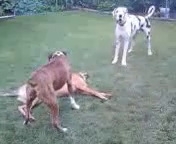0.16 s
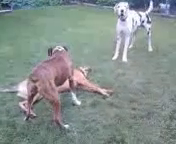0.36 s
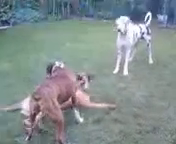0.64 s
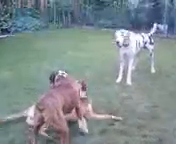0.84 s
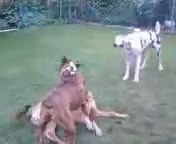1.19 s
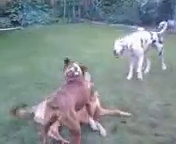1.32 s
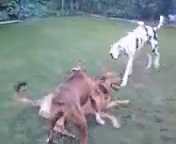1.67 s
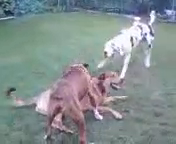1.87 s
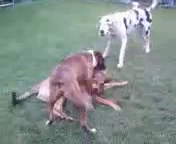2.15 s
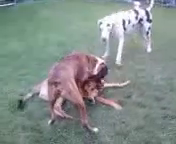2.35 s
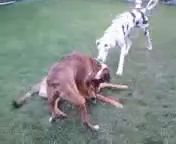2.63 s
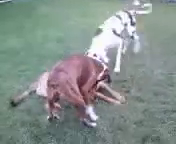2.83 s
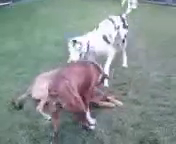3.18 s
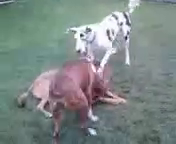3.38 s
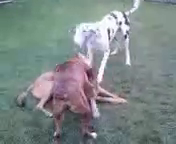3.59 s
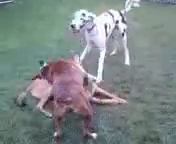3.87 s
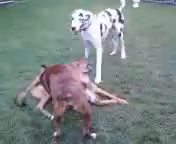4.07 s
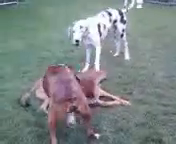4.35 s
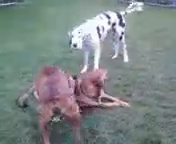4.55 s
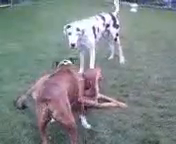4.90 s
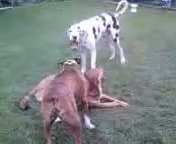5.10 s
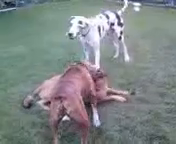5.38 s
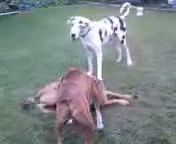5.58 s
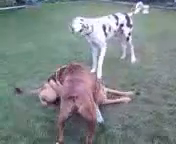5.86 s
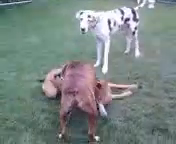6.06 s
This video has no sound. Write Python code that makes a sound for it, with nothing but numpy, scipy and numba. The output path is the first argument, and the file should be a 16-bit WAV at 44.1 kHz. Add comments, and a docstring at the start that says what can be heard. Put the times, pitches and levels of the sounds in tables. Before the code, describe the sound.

Quiet outdoor air and faint hiss open the scene. A large dog barks twice, hoarse and loud, then wrestling dogs growl low and snarl once, with a few guttural rumbles after. Four more single barks follow at intervals of roughly two thirds of a second. Fences and trees return short, weak echoes. The cheap microphone is close, narrow in band and distorts on the barks.

```python
"""Six barks and a snarl outdoors

A large dog barks six times close by, while wrestling dogs growl and snarl once.
Each bark is a rough pulse train shaped by throat and mouth, often ringing on its fifth harmonic.
Fences return distinct echoes and trees scatter, over quiet outdoor air and a faint uneven hiss
with soft swells, some perhaps from grass, and short noisy ticks.
The recorded band is narrow, closed above about 4 kHz, then clipped, which adds treble."""
import sys
import numpy as np
from scipy import signal
from scipy.fft import rfft, irfft, next_fast_len
from scipy.io import wavfile
from scipy.ndimage import uniform_filter1d
from numba import njit

SR = 44100
rng = np.random.default_rng(int(sys.argv[2]) if len(sys.argv) > 2 else 0)


def store_pcm(level_fs):
    """Save levels as 16-bit WAV."""
    pcm = np.round(np.clip(level_fs, -1, 1) * 32767).astype(np.int16)
    wavfile.write(sys.argv[1], SR, np.atleast_2d(pcm).T)


N = 274734

# All levels in the tables are relative: source functions may add a common gain or trim.
# One row per call: start_s, length_s, attack_s, release_db_per_s (nominal), widest_jaw (0-1 of the call),
#   pitch_hz (before bends), climb (share by which pitch and main resonance rise from start to end),
#   roughness (0-1, once settled), ring (0-1, at full opening), chest_db, deepen_db (throat, start to end),
#   throat_db, main_db, mouth_db, teeth_db, throat_hz, main_hz, mouth_hz, teeth_hz (before jaw motion)
BARK_CALLS = [ (1.050, 0.14, 0.02, 269, .47, 178.9, -.05, .4, .62, -45, -6, -18, -3, -12.5, -23, 517, 866, 1208, 2563),
              (1.629, 0.15, .02, 580, 0.41, 171, -.09, .6, 0.48, -38, 2.5, -20, -3.5, -10.5, -25, 471, 883, 1086, 2620),
              (3.593, 0.17, 0.021, 720, .6, 189.1, -0.011, 0.25, .04, -36, 12, -16.5, -6, -9, -25.5, 419, 880, 1063, 2770),
              (4.345, 0.17, .034, 540, .58, 171.2, .04, .58, .2, -39, 5, -17, -3.5, -4.5, -27, 502, 864, 1135, 2950),
              (5.038, .157, .028, 480, .52, 167.8, .03, .4, 0.057, -38.5, -8, -15, -4, -7.5, -31.5, 459, 896, 1085, 2690),
              (5.688, 0.16, 0.019, 647, .6, 173.1, 0.031, .5, 0.17, -43.5, -9, -13, -4, -8.5, -33, 493, 900.3, 1060, 2960)]
SNARL_CALLS = [(2.581, .215, .035, 340, .58, 235.7, .06, 0.35, 0.34, -32.5, 2.4, -16, -23.5, -17.5, -52, 425, 904, 1470, 2200)]
# Damping of one resonator stage for throat, main, open mouth and teeth: width_hz
BARK_WIDTHS_HZ = [237, 373, 454, 720]
SNARL_WIDTHS_HZ = [246, 340, 503, 650]
# How the same four resonances follow the jaw: shut_db (lost when shut), shut_drop (share of frequency
#   lost when shut), late_db (gained start to end), sag (share of frequency lost start to end),
#   speed (factor on the call's release)
BARK_JAW_RULES = [(1.976, 0.12, -1.5, 0.34, 0.75), (7.2, .07, -0.5, .01, 0.96), (6.1, -0.15, -1, .01, 0.63),
                  (48.84, .08, -1.5, .02, 2.8)]
SNARL_JAW_RULES = [(2.16, .06, 2.5, 0.044, 1.15), (11.1, 0.075, -8, .05, 0.74),
                   (22.2, -0.0052, -7, 0.0081, 2), (12, .04, -2.5, 0, 1.1)]
# Growls, and the low tail of the snarl at 2.8 s: start_s, length_s, chest_db, throat_db
GROWL_CALLS = [(2.08, 0.26, -44.5, -47), (2.33, 0.22, -37, -35), (2.8, 0.09, -41, -27.5),
               (2.925, 0.057, -36, -27.5), (2.99, 0.051, -32, -25.5), (3.4, .2, -40.5, -43.5)]
# Chest and throat resonances of a growl: centre_hz, width_hz (one stage)
GROWL_BODY_MODES = [(135, 220), (345, 208)]
# Soft swells of hissing noise, some perhaps from grass: start_s, length_s, level_db
NOISE_SWELLS = [(.35, 0.11, -73), (.67, 0.15, -68), (1.95, 0.99, -64.5), (2.86, 0.32, -59.5),
                (3.37, 0.138, -62.5), (4.01, 0.11, -53), (6.0, 0.45, -60)]
# Short noisy ticks: time_s, level_db
SHORT_TICKS = [(0.618, -50), (0.6833, -40.5), (0.729, -54), (1.442, -36.5), (2.406, -43.5), (3.4114, -39),
               (5.442, -41.5)]
# Spectrum shared by hiss, swells and ticks: frequency_hz, density_db (per Hz)
HISS_SPECTRUM = [(200, -1.5), (600, 0.5), (1100, 2), (2000, -2.5), (3100, -4), (5000, -40)]
# Fence reflections: delay_s, level_db
FENCE_ECHOES = [(.021, -24), (.047, -21), (.088, -28), (.33, -60.5)]
# Decay of sound scattered by the trees: frequency_hz, t60_s, level_db
TREE_DECAY = [(150, 1, 11.5), (510, 1, -5), (760, 1, -8.5), (1130, 0.89, -1.5), (1690, 0.47, 10.5),
              (3060, 0.83, 0)]
# Spectrum of the outdoor background: frequency_hz, density_db (per Hz)
AIR_SPECTRUM = [(12, -25.5), (20, 5.5), (22, -18.5), (113, -13), (224, -23.5), (343, -22), (1320, -38.5),
                (1630, -33.5), (1740, -39), (2340, -24.5), (3300, -35.5), (4290, -73.5), (7260, -120)]
# Narrow recorded band, closed above about 4 kHz: frequency_hz, gain_db
RECORDING_BAND = [(20, 9.5), (3000, -4.5), (3500, -1), (4000, -7.5), (4400, -36), (4800, -64), (6000, -100)]

CHEEK_HZ, CHEEK_WIDTH_HZ = 1890, 330  # a weak higher resonance that opens with the mouth
CLOSING_S = .05  # the jaw takes this long to shut once the effort ends
START_ROUGH = .9  # roughness (0-1) of the folds before they settle
WANDER = .028  # rms share by which the pitch drifts within a call
# the chest hums just ahead of the call and grows less with effort (an exponent below 1)
CHEST_WIDTH_HZ, CHEST_LEAD_S, CHEST_GROWTH = 277, .018, 0.53
ONSET_DB, ATTACK_CURVE = 47.5, 1.336  # depth below full level at the start; over 1 the rise is S-shaped
GROWL_START_DB, GROWL_SWELL_DB, GROWL_FADE_S = -13.5, 5.5, 0.01
HISS_DB, SWELL_GAIN_DB, TICK_GAIN_DB = -64, 3.5, -11  # a faint uneven hiss runs throughout
AIR_DB = -57.5
TOP_HZ = 15800  # upper limit after clipping


def barks():
    """Source-filter principle: six loud, hoarse calls driven through a quickly opening jaw."""
    return voice(BARK_CALLS, BARK_JAW_RULES, BARK_WIDTHS_HZ, trims_db=[-0.12, 0.29, -0.86, 0.8],
                 cheek_db=-15.5, jitter=.045, rasp_db=-0.58, pitch_drop=.12, waver_db=1.2)


def snarl():
    """Source-filter principle: one softer call whose pitch falls further as the jaw shuts."""
    return voice(SNARL_CALLS, SNARL_JAW_RULES, SNARL_WIDTHS_HZ, trims_db=[-4.5, -1.2, -3.7, -9.0],
                 cheek_db=-13, jitter=0.049, rasp_db=2.5, pitch_drop=.33, waver_db=2.0)


def voice(calls, follow, widths_hz, trims_db, cheek_db, jitter, rasp_db, pitch_drop, waver_db, order=5):
    """Source and filter: folds drive chest and tract; the main resonance can lock on to a harmonic."""
    columns = current(calls, CHEST_LEAD_S)
    age, length, attack, release, widest, pitch, climb, rough, ring, chest_db, deepen_db = columns[:11]
    levels_db, tunings_hz = columns[11:15], columns[15:]
    progress = np.clip(age / (length + CLOSING_S), 0, 1)
    shut, late = 1 - jaw(progress, widest), progress - .5

    rough = rough + (START_ROUGH - rough) * shut * (1 - progress * .85)
    bend = 1 + climb * late + WANDER * wobble(32)
    pitch = pitch * bend * (1 - pitch_drop * shut)
    source, cycles = folds(pitch, rough, jitter, shimmer_db=4.5)

    bands, gains = [], []
    pulls = [1, bend, 1, 1]  # only the main resonance bends with the pitch
    for db, hz, width, trim, pull, rule in zip(levels_db, tunings_hz, widths_hz, trims_db, pulls, follow):
        shut_db, shut_drop, late_db, sag, speed = rule
        tuned_hz = hz * pull * (1 - shut_drop * shut - sag * late)
        bands.append(steady(resonate(source, tuned_hz, width)))
        level_db = db + trim - shut_db * shut ** 2 + late_db * late + waver_db * wobble(45)
        gains.append(amp(level_db) * effort(age, length, attack, speed * release))

    throat, main, mouth, teeth = bands
    throat = throat * amp(deepen_db * late)
    ring = np.clip(ring * np.sqrt(1 - shut), 0, 1)
    harmonic = np.cos(2 * np.pi * order * cycles)
    main = steady(np.sqrt(1 - ring) * main + np.sqrt(ring) * harmonic)
    mouth = mouth + amp(cheek_db) * steady(resonate(source, CHEEK_HZ, CHEEK_WIDTH_HZ))
    tract = sum(band * gain for band, gain in zip([throat, main, mouth, teeth], gains))

    hum = effort(age + CHEST_LEAD_S, length + CHEST_LEAD_S, attack, release) ** CHEST_GROWTH
    chest = amp(chest_db) * hum * steady(resonate(source, pitch, CHEST_WIDTH_HZ))
    rasp = unit(amp(rasp_db * rough * wobble(260)))  # flapping tissue chops the rough parts
    return rasp * (chest + tract)


def folds(pitch, rough, jitter, shimmer_db):
    """Glottal excitation: uneven pulses mixed with air that puffs once a cycle; also the cycle count."""
    cycles = np.cumsum(pitch * (1 + jitter * rough * wobble(170))) / SR
    glottal_ticks = np.diff(np.floor(cycles), prepend=0)
    pulses = unit(glottal_ticks * amp(shimmer_db * wobble(150)))
    puffs = unit(rng.standard_normal(N) * (1.7 + np.exp(-4 * (cycles % 1))))
    rough = np.clip(rough, 0, 1)
    return np.sqrt(1 - rough) * pulses + np.sqrt(rough) * puffs, cycles


def jaw(progress, widest):
    """Articulation: the mouth opens and shuts in one arch, from 0 shut to 1 wide."""
    skew = np.log(.5) / np.log(np.clip(widest, .1, .9))  # puts the peak at the widest moment
    return np.abs(np.sin(np.pi * progress ** skew))


def effort(age, length, attack, release):
    """Breath pressure: one push of air rises fast, holds, then falls steadily in dB."""
    rise_db = ONSET_DB * np.exp(-(np.maximum(age, 0) / attack) ** ATTACK_CURVE)
    fall_db = release * np.maximum(age - length, 0)
    return np.clip(age / 0.0052, 0, 1) * amp(-rise_db - fall_db)


def resonate(x, hz, width, count=3):
    """Cascaded resonance: repeated moving resonators leave dark valleys on both sides."""
    hz = hz * np.ones(N)
    step, damping = 2 * np.sin(np.pi * hz / SR), width / hz
    for _ in range(count):
        x = band_pass(x, step, damping)
    return x


@njit
def band_pass(x, step, damping):
    """Damped oscillation: a two-pole resonator whose tuning may change at every sample."""
    y, low, band = np.zeros(len(x)), 0., 0.
    for i in range(len(x)):
        low += step[i] * band
        band += step[i] * (x[i] - low - damping[i] * band)
        y[i] = band * damping[i]
    return y


def growls():
    """Low-rate phonation: slow, irregular pulses excite the chest and a closed mouth."""
    source, _ = folds(np.full(N, 62.), rough=.5, jitter=.25, shimmer_db=1.5)
    age, length, *levels_db = current(GROWL_CALLS)
    swell = amp(GROWL_START_DB + GROWL_SWELL_DB * np.minimum(age / length, 1))
    fade_in = np.clip(age / GROWL_FADE_S, 0, 1)
    fade_out = np.exp(-np.maximum(age - length, 0) / GROWL_FADE_S)
    uneven = amp(2.2 * wobble(28.33))
    body = sum(steady(resonate(source, hz, width)) * amp(db)
               for (hz, width), db in zip(GROWL_BODY_MODES, levels_db))
    return swell * fade_in * fade_out * uneven * body


def fences(x):
    """Specular reflection: each fence returns one delayed, weaker copy."""
    return sum(amp(db) * np.pad(x, (round(delay * SR), 0))[:N] for delay, db in FENCE_ECHOES)


def trees(x, wet_db, swell_s, patchy_db=3, count=2):
    """Diffuse scattering: patchy decaying noise tails, smeared by moving leaves."""
    hz, t, z = signal.stft(rng.standard_normal((count, SR)), SR, nperseg=256)
    decay = np.array(TREE_DECAY)
    t60 = along(decay[:, [0, 1]], hz)[:, None]
    colour_db = along(decay[:, [0, 2]], hz)[:, None]
    patches = uniform_filter1d(rng.standard_normal(z.shape), 3, 1)  # smooth over frequency
    patches = unit(uniform_filter1d(patches, 24, 2))  # then over time
    level_db = colour_db + patchy_db * patches * np.minimum(t / 0.27, 1) - 60 * t / t60
    tails = signal.istft(z * amp(level_db) * (1 - np.exp(-t / swell_s)), SR, nperseg=256)[1]
    tails = tails / np.linalg.norm(tails)
    return amp(wet_db) * sum(signal.fftconvolve(x * wobble(130), tail)[:N] for tail in tails)


def hiss():
    """Amplitude-modulated noise: a faint uneven hiss with soft swells and short noisy ticks."""
    t = np.arange(N) / SR
    age, length, swell_db = current(NOISE_SWELLS)
    arch = np.sin(np.pi * np.clip(age / length, 0, 1))
    level = amp(HISS_DB) + amp(swell_db + SWELL_GAIN_DB) * arch
    uneven = unit(amp(3.2 * wobble(16) + 3.2 * wobble(110)))
    # each tick peaks 3 ms after its time and decays both ways over 4 ms
    ticks = sum(amp(db + TICK_GAIN_DB) * np.exp(-np.abs(t - start - .003) / .004)
                for start, db in SHORT_TICKS)
    return (level * uneven + ticks) * noise(HISS_SPECTRUM)


def air():
    """Broadband ambience: coloured noise whose level drifts slowly."""
    return amp(AIR_DB) * noise(AIR_SPECTRUM) * amp(0.81 * wobble(0.73))


def current(rows, lead=0):
    """Event timing: per sample, time since the latest event (chosen lead s early) and its other columns."""
    rows, t = np.array(rows), np.arange(N) / SR
    latest = np.maximum(np.searchsorted(rows[:, 0], t + lead) - 1, 0)
    start, *columns = rows[latest].T
    return t - start, *columns


def noise(spectrum):
    """Spectral shaping: white noise becomes coloured noise of rms 1."""
    return unit(filtered(rng.standard_normal(N), lambda f: amp(along(spectrum, f))))


def wobble(rate, order=6):
    """Random modulation: a smooth curve of rms 1 with rate knots a second."""
    fine = signal.resample_poly(rng.standard_normal(int(N * rate / SR) + 4), order, 1)
    return unit(np.interp(np.arange(N) * rate * order / SR, np.arange(len(fine)), fine))


def filtered(x, response):
    """Linear filtering: the spectrum of x times a response given as a function of frequency."""
    m = next_fast_len(N + SR // 2)
    return irfft(rfft(x, m) * response(np.fft.rfftfreq(m, 1 / SR)), m)[:N]


def along(points, hz):
    """Logarithmic frequency scale: (Hz, value) points interpolated on a log axis."""
    f, v = np.transpose(points)
    return np.interp(np.log(hz + 1), np.log(f + 1), v)


def steady(x, size=680):
    """Power normalization: x held near rms 1 over a few voice cycles (size in samples)."""
    power = uniform_filter1d(uniform_filter1d(x ** 2, size), size)
    return x / np.sqrt(np.abs(power) + 1e-12)


def unit(x):
    """Power normalization: the whole of x at rms 1."""
    return x / np.sqrt(np.mean(x ** 2) + 1e-20)


def amp(db):
    """Logarithmic level: decibels to amplitude gain."""
    return 10 ** (np.asarray(db) / 20)


def scene():
    """Superposition: dogs, their reflections, hiss and outdoor air add linearly."""
    dogs = barks() + snarl() + growls()
    answer = fences(dogs) + trees(dogs, wet_db=-24.5, swell_s=0.019)
    return (dogs + answer + hiss() + air())[None]


def record(dry):
    """Clipping distortion: a narrow band, closed above about 4 kHz, is cut flat and gains treble."""
    narrow = filtered(dry[0], lambda f: amp(along(RECORDING_BAND, f)))
    clipped = np.clip(narrow, -.725, .705)  # a little lopsided
    return filtered(clipped, lambda f: np.clip((TOP_HZ - f) / 150 + .5, 0, 1))[None]


dry = scene()
out = record(dry)
store_pcm(out)
```